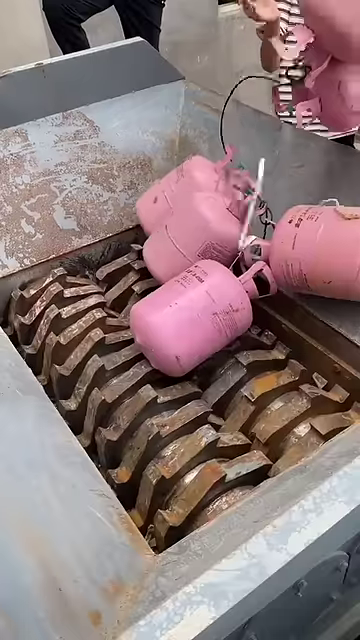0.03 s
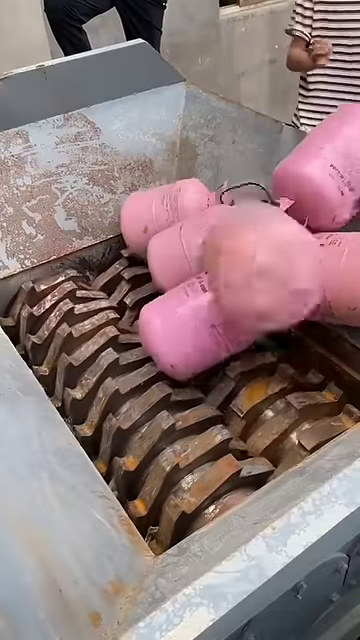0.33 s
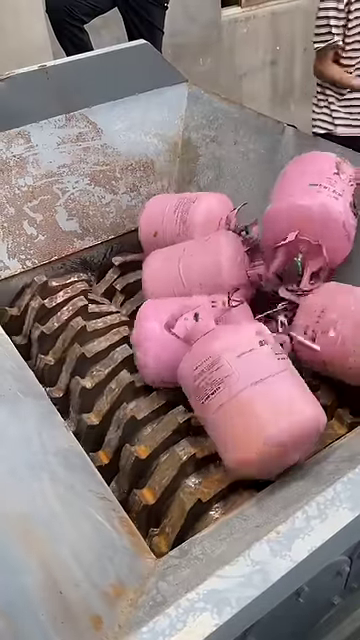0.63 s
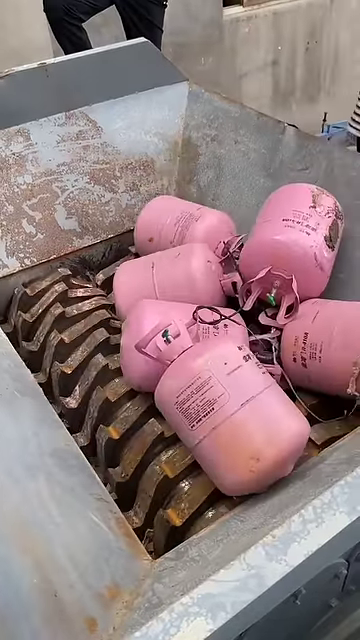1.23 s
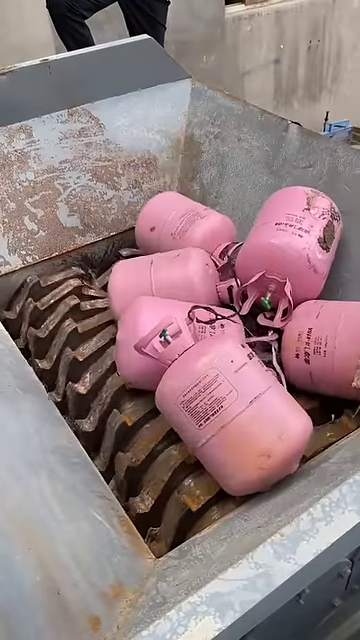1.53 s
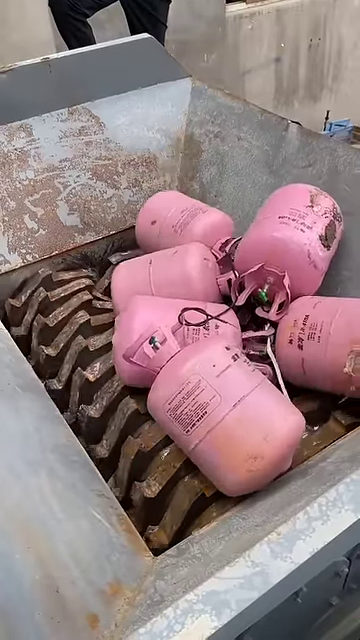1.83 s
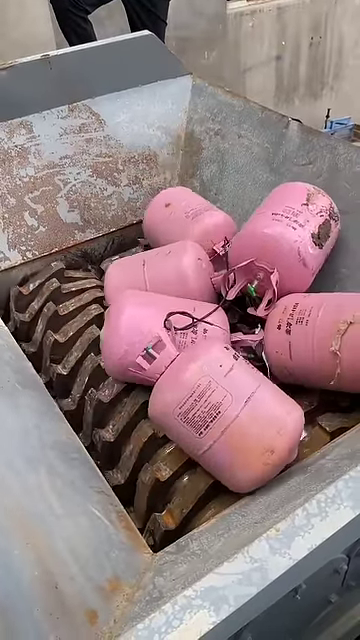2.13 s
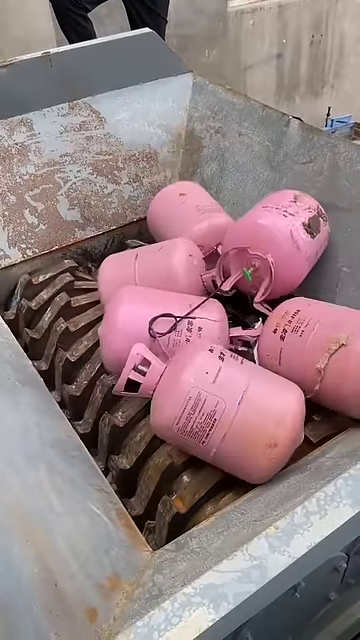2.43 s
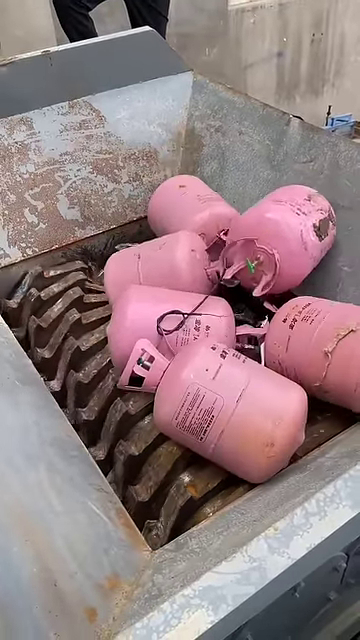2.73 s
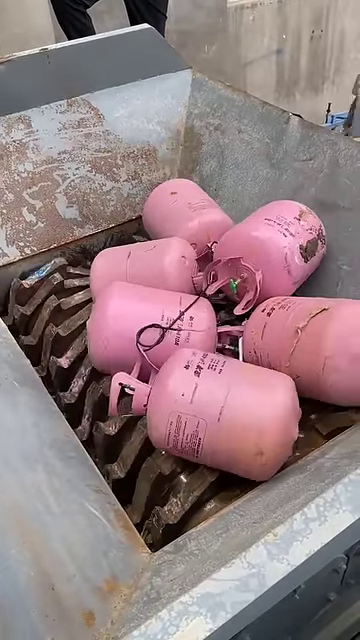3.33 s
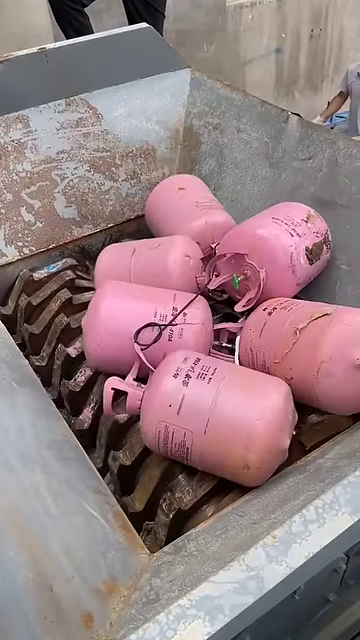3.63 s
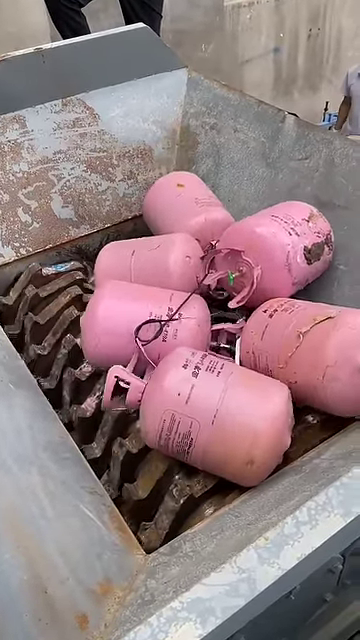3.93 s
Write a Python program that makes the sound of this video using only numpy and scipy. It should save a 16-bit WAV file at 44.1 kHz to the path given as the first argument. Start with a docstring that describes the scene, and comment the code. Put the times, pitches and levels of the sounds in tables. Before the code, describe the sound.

Industrial shredder rumbling, with hollow gas cylinders clanging and rattling on its turning teeth.

```python
"""A twin-shaft shredder rumbles in a yard, the microphone close, at the rim of its steel hopper.
Empty gas cylinders tumble in and clank, their shells ringing, and knock dully against the frame.
The pile rattles and settles on the turning rotors, whose teeth nudge the cylinders and stick and
slip along them, once with a thin squeal. Blows and scrapes echo off the hopper and the yard walls."""
import sys
import numpy as np
from scipy import signal
from scipy.fft import rfft, irfft, next_fast_len
from scipy.io import wavfile
from scipy.ndimage import uniform_filter1d, map_coordinates

SR = 44100
rng = np.random.default_rng(int(sys.argv[2]) if len(sys.argv) > 2 else 0)


def materialize(psi):
    """Save the field psi as 16-bit PCM at rate SR to the path in sys.argv[1].

    A 1-D psi becomes a single channel; in a 2-D psi each row is a channel.
    """
    bounded = np.clip(np.atleast_2d(psi).T, -1, 1)
    quanta = np.round(bounded * 32767).astype(np.int16)
    wavfile.write(sys.argv[1], SR, quanta)


N = 176400

# swells of the drive's hum, harmonics 1 to 3 (time [s], level [dB])
HUM_FIRST = [(0, -33), (.55, -36), (.8, -46), (1.3, -38.5), (1.58, -47), (1.72, -39), (1.9, -36),
             (2.05, -57), (2.38, -57), (2.52, -31.5), (2.8, -36.5), (3.12, -44), (3.42, -36), (3.68, -50),
             (3.82, -32.5), (4, -33)]
HUM_SECOND = [(0, -39), (1.25, -40.5), (1.7, -49), (2.6, -34), (3.301, -52), (3.6, -31), (3.8, -41),
              (4, -30.5)]
HUM_THIRD = [(0, -43), (.5, -32), (.8, -38.5), (1.8, -42), (2.15, -30), (2.4, -44.5), (3.2, -43),
             (3.5, -34), (3.75, -48), (4, -26.5)]
# wavering tones of gears and frame (frequency [Hz], width [Hz], level [dB])
GEAR_TONES = [(180.4, 12, -40.5), (250.4, 13, -41.5), (271.2, 16, -40), (640.5, 12, -43.5),
              (697, 16, -48.5), (756, 20, -44.5)]
# course of the load (time [s], rumble gain [dB], rattle gain [dB], grit gain [dB])
LOAD_GAINS = [(0.0, -20, -30, -43.5), (0.34, -22.5, -25.5, -33), (0.5, -21.5, -29, -38),
              (0.67, -27.5, -30, -38.5), (1.06, -22.5, -33.5, -42.5), (1.37, -26.5, -39, -46),
              (1.83, -30, -42.5, -50.5), (2.09, -29, -42, -63), (2.31, -33.5, -40, -58),
              (2.55, -31.5, -42, -48.5), (2.94, -30.5, -40, -56), (3.25, -27, -38.5, -56),
              (3.43, -28.5, -39, -51), (4.0, -31, -42, -50.5)]
# spectra of the frame's rumble, the pile, the blows and the friction (frequency [Hz], gain [dB])
RUMBLE_SPECTRUM = [(20, -54), (40, -20), (85, -7.5), (120, 2.5), (160, -3), (280, -2.5), (400, -5.5),
                   (560, -11), (750, -11), (1000, -20.5), (2500, -56.5)]
RATTLE_SPECTRUM = [(300, -6.5), (700, -2.5), (950, 1), (1250, 7), (1500, -1), (1700, -0.5), (2300, -1.5),
                   (3200, -12), (4500, -14.5), (9000, -24.5)]
GRIT_SPECTRUM = [(1500, -12), (3500, -3), (5000, 8), (6200, 3.5), (8500, -8), (10500, 0), (12000, -25),
                 (15500, -19)]
CRACK_SPECTRUM = [(300, -41), (1100, 16), (2500, 4.5), (5000, 12.5), (8500, 2), (11000, 2), (15500, -3.5)]
THUD_SPECTRUM = [(40, -17), (110, 1), (250, -4.5), (420, 10), (700, -10), (1500, -38), (5000, -69)]
RASP_SPECTRUM = [(300, 2), (900, -8), (1220, 9), (1450, -5), (1650, -0.5), (2200, -17), (3200, -26.5),
                 (6000, -63)]
SCREECH_SPECTRUM = [(1500, -32), (3300, -8.5), (4700, 4.5), (5800, 3), (7000, -2.5), (12000, -41)]
FIZZ_SPECTRUM = [(4000, -25), (7000, -35), (9000, 9), (11500, 10), (13000, -4), (15500, 5)]
# modes of an empty cylinder (frequency [Hz], level [dB], t60 [s])
SHELL_MODES = [(973.4, -5.5, 0.56), (1035, -4, 0.42), (1076, -11.5, 0.53), (1183, 2.5, 0.24),
               (1232, 0, 0.5), (1350, -7, 0.38), (1659, 0, 0.48), (2061, 4, 0.18), (2274, -4, 0.32),
               (2618, -4.5, 0.18), (2910, -18, 0.86), (3000, -5.5, 0.22), (3234, -5, 0.25),
               (3584, -25, 0.35), (4720, -4, 0.22), (5080, -10, 0.3)]
# clanks of the cylinders and, at 1.981 s, a very short, faint, high click
# (time [s], ring gain [dB], ring length [share of the free shell's], favoured frequency [Hz],
# lift there [dB], crack level [dB], shimmer level [dB])
CLANKS_AND_CLICK = [(0.017, -33.5, 0.49, 2140, 14.5, -32.5, -36), (.058, -36.5, 0.37, 2620, 15, -26, -49),
                    (.214, -35, 0.46, 1667, 10, -25, -37), (0.2565, -33.5, 1.94, 944, 17, -13.5, -20),
                    (.278, -41, 0.77, 3260, 22, -18.5, -47), (.333, -38, 0.7, 1210, 15.5, -48, -53),
                    (.379, -32, 1.2, 2650, 17, -17, -25), (.6128, -28, .75, 1667, 13, -19, -30),
                    (.381, -36, 0.23, 1166, 24.5, -27, -38), (0.419, -44, 0.78, 1400, 16, -27, -31),
                    (0.5786, -53, 0.17, 4700, 3, -28, -26.5), (.617, -31.5, 1.15, 3700, 13, -32, -40),
                    (.775, -54, 0.49, 2100, -1, -31.5, -39.5), (1.714, -41.5, 0.65, 2300, 0, -32, -39.5),
                    (1.981, -62, .3, 4650, 7, -41, -53), (2.159, -41, 0.45, 2300, 15, -42, -34.5),
                    (2.186, -42, 0.57, 1020, 19, -31, -60), (2.344, -49, 0.64, 2900, 14.5, -51, -59),
                    (2.432, -46, 0.4, 980, 17, -56, -48), (3.4177, -44, 0.5, 1667, 18, -29, -37)]
# a tooth dragging along a cylinder
# (time [s], length [s], rasp level [dB], ring level [dB], screech level [dB], fizz level [dB])
TOOTH_DRAGS = [(0.018, 0.053, -39, -59, -30.5, -49), (0.14, 0.019, -39, -20.5, -56, -62),
               (2.08, 0.051, -45, -42, -54, -80), (2.133, 0.12, -39, -30.5, -50, -84),
               (2.155, 0.013, -49, -48, -35, -39), (2.227, 0.025, -41, -48, -49, -46.5),
               (2.285, 0.096, -52, -43, -50.5, -76), (2.581, 0.16, -64, -69, -54, -51),
               (2.717, 0.0091, -63, -62, -62, -47), (2.922, 0.014, -50, -66, -43, -59),
               (3.336, 0.021, -42, -26, -64, -75), (3.42, 0.064, -32, -31, -47, -63),
               (3.429, 0.017, -39, -46, -34.5, -49), (3.477, 0.035, -34.5, -36, -67, -66),
               (3.88, 0.062, -52, -66, -67, -50.5)]
# teeth and cylinders hitting the frame (time [s], peak level [dB], plate frequency [Hz])
FRAME_KNOCKS = [(0.056, -17, 290), (.1995, -8, 326), (.258, -14.5, 253), (0.38, -11.5, 197),
                (.465, -13.5, 128), (.614, -8, 308), (0.778, -16, 168), (0.935, -23, 118),
                (1.072, -18, 186), (1.161, -15, 144), (2.091, -22, 217), (2.265, -21.5, 139),
                (2.435, -24.5, 233), (3.244, -17, 353), (3.276, -20.5, 302), (3.319, -22.5, 264)]
# swell of the squeal (time [s], level [dB])
SQUEAL_LEVEL = [(2.205, -120), (2.217, -14), (2.262, 0.5), (2.29, -4.5), (2.345, -44), (2.38, -23),
                (2.46, -120)]
# echo of hopper and yard (frequency [Hz], t60 [s])
YARD_DECAY = [(150, 0.26), (1500, 0.94), (10000, 0.11)]
# treble colouring with two deep notches, near 7.5 and 13.5 kHz (frequency [Hz], gain [dB])
TREBLE_COLOUR = [(6100, -1), (6700, -10.5), (7100, -35), (7600, -30), (8100, -5.5), (8600, 4), (11500, 0.5),
                 (12400, -5), (13200, -20), (13900, -32), (14500, -4.5), (15500, -2.5)]


def amp(db):
    """Decibels to gain."""
    return 10 ** (np.asarray(db) / 20)


def decay(t, t60):
    """A fade of 60 dB every t60 seconds."""
    return amp(-60 * t / t60)


def unit(x):
    """Scaled to rms 1."""
    return x / np.sqrt(np.mean(x ** 2) + 1e-20)


def along(points, hz):
    """(frequency, value) points read at hz on a log axis."""
    point_hz, values = np.transpose(points)
    return np.interp(np.log(hz + 1), np.log(point_hz + 1), values)


def curves(rows):
    """One value per sample for each column after the time."""
    times, *columns = np.transpose(rows)
    return [np.interp(np.arange(N) / SR, times, column) for column in columns]


def wobble(rate):
    """A smooth random curve, rate knots a second."""
    return map_coordinates(rng.standard_normal(2048), [np.arange(N) * rate / SR], mode="wrap")


def colour(x, spectrum, size=8192):
    """x through a causal filter with the given spectrum."""
    cepstrum = irfft(np.log(amp(along(spectrum, np.fft.rfftfreq(size, 1 / SR)))))
    cepstrum[1:size // 2] *= 2  # folded for minimum phase
    cepstrum[size // 2 + 1:] = 0
    return signal.fftconvolve(x, irfft(np.exp(rfft(cepstrum))))[:len(x)]


def add(track, start_s, sound):
    """Mix a sound into the track at start_s."""
    part = track[max(round(start_s * SR), 0):][:len(sound)]
    part += sound[:len(part)]


def machine(load_db, drive_hz=69.48, wander=0.01348, throb_db=-12):
    """Drive hum, gear tones, and a frame that rumbles and throbs once per turn of the drive."""
    turns = np.cumsum(drive_hz * (1 + wander * wobble(4))) / SR
    hum = gears = 0
    for harmonic, swells in enumerate([HUM_FIRST, HUM_SECOND, HUM_THIRD], 1):
        level = amp(curves(swells)[0] + 2.4 * wobble(12))
        hum += level * np.sin(2 * np.pi * (harmonic * turns + rng.random()) + 0.56 * wobble(12))
    for hz, width, db in GEAR_TONES:
        phase = 2 * np.pi * hz * np.arange(N) / SR
        gears += amp(db) * (wobble(width) * np.sin(phase) + wobble(width) * np.cos(phase))
    beats = np.diff(np.floor(turns), prepend=0) * amp(2.2 * wobble(50))
    throb = amp(throb_db) * unit(colour(beats, RUMBLE_SPECTRUM))
    rumble = amp(-2 + 1.64 * wobble(16)) * unit(colour(rng.standard_normal(N), RUMBLE_SPECTRUM))
    return np.sqrt(2) * hum + gears + amp(load_db) * (rumble + throb)


def contacts(per_s, spread_db):
    """Random tiny impacts of uneven size, rms 1."""
    hits = (rng.random(N) < per_s / SR) * rng.choice([-1, 1], N)
    return unit(hits * amp(spread_db * np.clip(rng.standard_normal(N), -2, 2)))


def shimmer(t60, low_hz=2800, high_hz=11500, count=50):
    """The crowd of short-lived high modes of steel; the higher ones die sooner."""
    t = np.arange(SR // 3) / SR
    spread = (np.arange(count)[:, None] + rng.random((count, 1))) / count
    hz = low_hz * (high_hz / low_hz) ** spread
    fade = decay(t, t60 * np.sqrt(low_hz / hz))
    modes = fade * np.sin(2 * np.pi * (hz * t + rng.random((count, 1))))
    return modes.sum(axis=0) * np.sqrt(2 / count)


def sustained(x, window):
    """Friction holds a ring at a steady swing, evened out over window samples."""
    return x / np.sqrt(np.abs(uniform_filter1d(x ** 2, size=window)) + 1e-9)


def on_steel(friction, spectrum, shifts_per_s=9, resonance_db=2.5):
    """Friction, direct and through tooth and hopper resonances that shift as the contact wanders."""
    rung = 0
    for _ in range(5):
        modes = np.diff(shimmer(t60=0.093, low_hz=1394, high_hz=12094, count=30), prepend=0)
        rung += wobble(shifts_per_s) * signal.fftconvolve(friction, modes)[:N]
    resonance = amp(resonance_db) * unit(sustained(rung, window=4400))
    return unit(colour(unit(friction) + resonance, spectrum))


def shell_ring(focus_hz, lift_db, length, width_octaves=0.089, detune=0.0026):
    """A cylinder's modes; those favoured by the contact start louder and lose the excess quickly."""
    t = np.arange(SR) / SR
    hz, db, t60 = np.transpose(SHELL_MODES)[:, :, None]
    favour = np.exp(-.5 * (np.log2(hz / focus_hz) / width_octaves) ** 2)
    level = amp(db + rng.standard_normal(hz.shape))
    hz = hz * (1 + detune * rng.standard_normal(hz.shape))  # no two cylinders ring quite alike
    excess = (amp(lift_db * favour) - 1) * decay(t, 0.27 * length)
    fade = decay(t, t60 * length) + excess
    return np.sum(level * fade * np.sin(2 * np.pi * (hz * t + rng.random(hz.shape))), axis=0)


def pile(rattle_db, grit_db, ticks_per_s=12):
    """Cylinders jostle on the rotors: many small contacts, their ring, grit and stray ticks."""
    jostle_db = 2.1 * wobble(18)
    chatter = on_steel(contacts(per_s=900, spread_db=3.5) + rng.standard_normal(N), RATTLE_SPECTRUM)
    taps = contacts(per_s=90, spread_db=-0.5)
    ringing = unit(signal.fftconvolve(taps, shell_ring(focus_hz=1140, lift_db=4.5, length=0.3))[:N])
    rattle = amp(-3) * chatter + amp(-9.5) * ringing
    grit = on_steel(contacts(per_s=1300, spread_db=15) + 1.3 * rng.standard_normal(N), GRIT_SPECTRUM)
    ticks = np.zeros(N)  # small bits of metal catching on the teeth
    for when, size in rng.random((round(ticks_per_s * N / SR), 2)):
        add(ticks, when * N / SR, (.5 + size) * shimmer(t60=0.18, low_hz=1465, high_hz=6000, count=7))
    treble = amp(-2.5 + jostle_db + 2.8 * wobble(34.62)) * grit + amp(-19) * unit(ticks)
    return amp(rattle_db + jostle_db) * rattle + amp(grit_db) * treble


def clanks(rise_s=0.00052):
    """Struck cylinders crack, ring and shimmer; one entry is just a very short, faint, high click."""
    out, t = np.zeros(N), np.arange(SR // 3) / SR
    rise = 1 - np.exp(-t / rise_s)
    for start_s, ring_db, length, focus_hz, lift_db, crack_db, shimmer_db in CLANKS_AND_CLICK:
        noise = unit(colour(rng.standard_normal(len(t)), CRACK_SPECTRUM))
        crack = amp(crack_db) * decay(t, t60=0.072) * noise
        clank = amp(ring_db) * shell_ring(focus_hz, lift_db, length)
        clank[:len(t)] += crack + amp(shimmer_db) * shimmer(t60=0.25, count=36)
        clank[:len(t)] *= rise
        add(out, start_s, clank)
    return out


def scrapes(rise_s=0.0058, fall_s=0.011):
    """Teeth stick and slip along a cylinder, rasping it and making its shell groan."""
    out, t = np.zeros(N), np.arange(N) / SR
    slips = contacts(per_s=320, spread_db=8.5)
    rasp = on_steel(slips + 0.78 * rng.standard_normal(N), RASP_SPECTRUM)
    shell = shell_ring(focus_hz=1218, lift_db=18, length=0.89, width_octaves=0.043)
    shell *= 1 - np.exp(-t[:SR] / rise_s)
    groan = sustained(unit(signal.fftconvolve(slips, shell)[:N]), window=700)
    screech = on_steel(slips + 0.57 * rng.standard_normal(N), SCREECH_SPECTRUM)
    fizz = on_steel(slips + rng.standard_normal(N), FIZZ_SPECTRUM)
    for start_s, length_s, rasp_db, ring_db, screech_db, fizz_db in TOOTH_DRAGS:
        rise = np.clip((t - start_s) / rise_s, 0, 1)
        fall = np.exp(-np.maximum(t - start_s - length_s, 0) / fall_s)
        out += rise * fall * (amp(rasp_db) * rasp + amp(ring_db) * groan
                              + amp(screech_db) * screech + amp(fizz_db) * fizz)
    return out


def knocks(shudder=0.058, rise_s=0.0017):
    """A low push, a short shudder of the frame and a few swings of the plate that was hit."""
    out, t = np.zeros(N), np.arange(SR // 4) / SR
    for start_s, peak_db, hz in FRAME_KNOCKS:
        push = shudder * rng.standard_normal(len(t)) * decay(t, t60=0.031)
        push[0] += 1
        plate = np.sin(2 * np.pi * hz * t) * (1 - np.exp(-t / rise_s)) ** 2 * decay(t, t60=0.04)
        knock = amp(-2) * unit(colour(push, THUD_SPECTRUM)) + unit(plate)
        add(out, start_s, amp(peak_db) * knock / np.abs(knock).max())
    return out


def squeal(pitch_hz=7164, glide=0.004, jitter=0.0038, chatter_db=4, octave_db=-26):
    """A brief, chattering whistle of steel on steel, with its octave."""
    hz = pitch_hz * (1 + glide * wobble(45) + jitter * wobble(900))
    phase = 2 * np.pi * np.cumsum(hz) / SR
    level = amp(curves(SQUEAL_LEVEL)[0]) * unit(amp(chatter_db * wobble(400)))
    return level * (np.sin(phase) + amp(octave_db) * np.sin(2 * phase))


def yard_echo(x):
    """Hopper and walls answer 5 ms behind the direct sound; each frequency dies at its own speed."""
    hz, t, noise = signal.stft(rng.standard_normal(SR // 2), SR, nperseg=256)
    tail = signal.istft(noise * decay(t, along(YARD_DECAY, hz)[:, None]), SR, nperseg=256)[1]
    return signal.fftconvolve(x, np.pad(tail / np.linalg.norm(tail), (SR // 200, 0)))[:N]


def scene(echo_db=-11):
    """At the hopper's rim: the running machine, its pile, the squeal, and the clatter with its echo."""
    rumble_db, rattle_db, grit_db = curves(LOAD_GAINS)
    clatter = clanks() + knocks() + scrapes()
    direct = machine(rumble_db) + pile(rattle_db, grit_db) + squeal() + clatter
    return (direct + amp(echo_db) * yard_echo(clatter))[None]


def record(dry, top_hz=15800):
    """Mono, the treble coloured by two deep notches; nothing above top_hz gets through."""
    size = next_fast_len(N + SR // 2)
    spectrum = rfft(colour(dry[0], TREBLE_COLOUR), size)
    passband = np.fft.rfftfreq(size, 1 / SR) < top_hz
    return irfft(spectrum * passband, size)[None, :N]


dry = scene()
out = record(dry)
materialize(out)
```